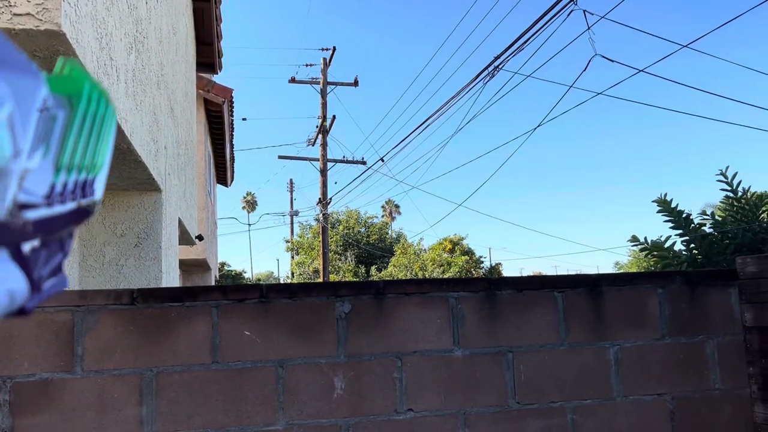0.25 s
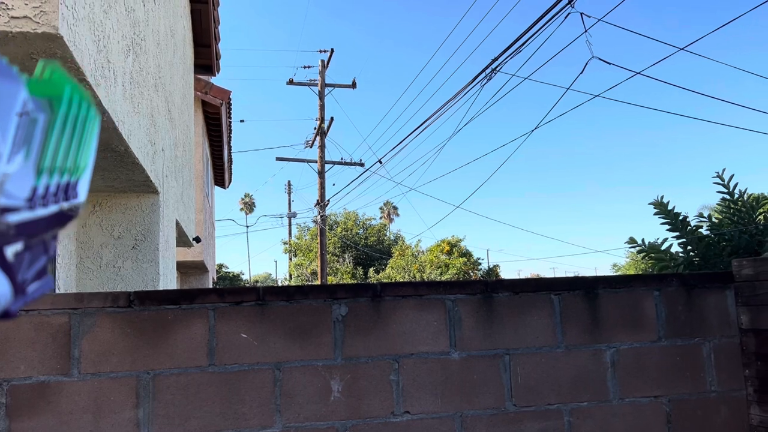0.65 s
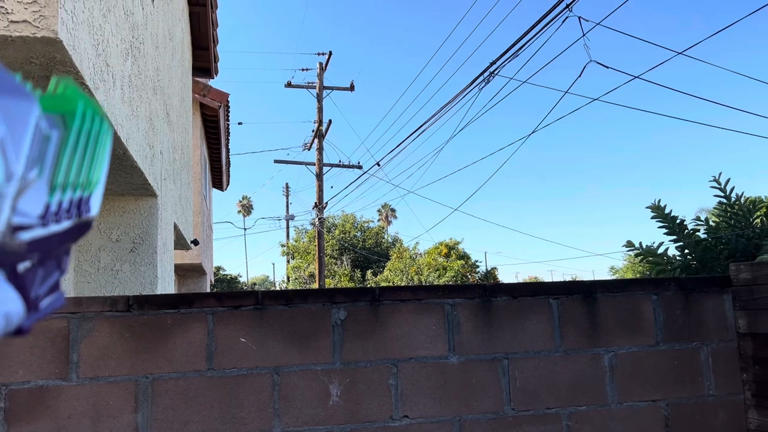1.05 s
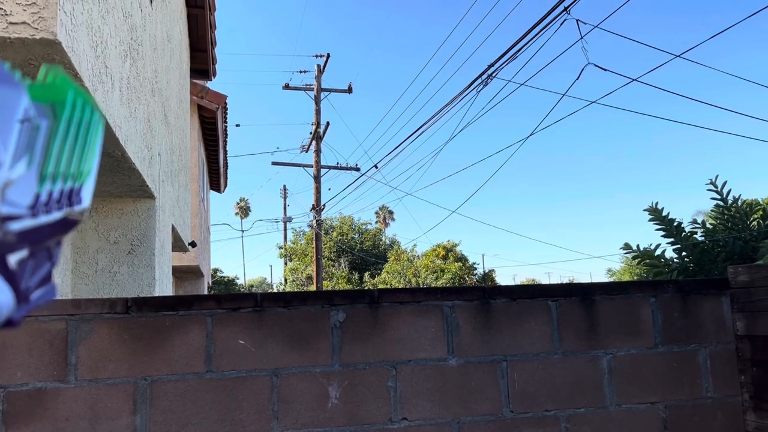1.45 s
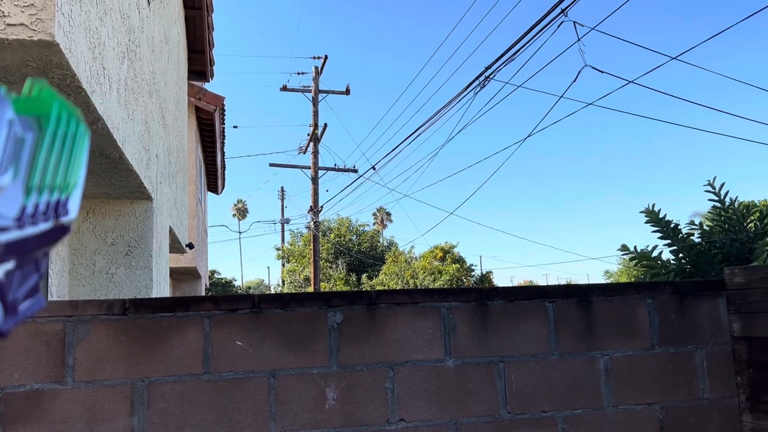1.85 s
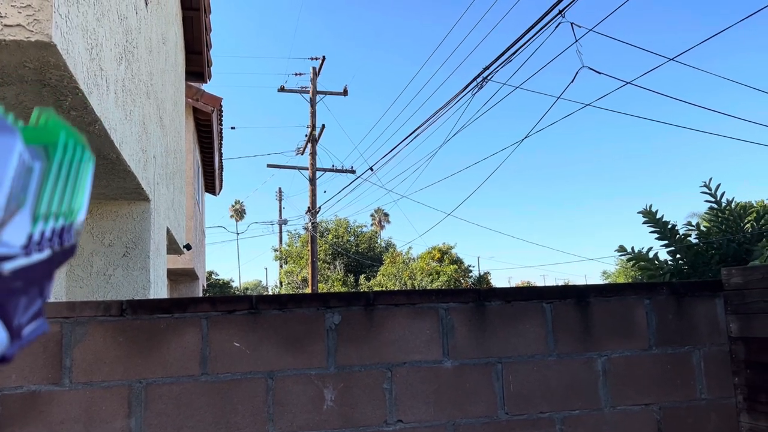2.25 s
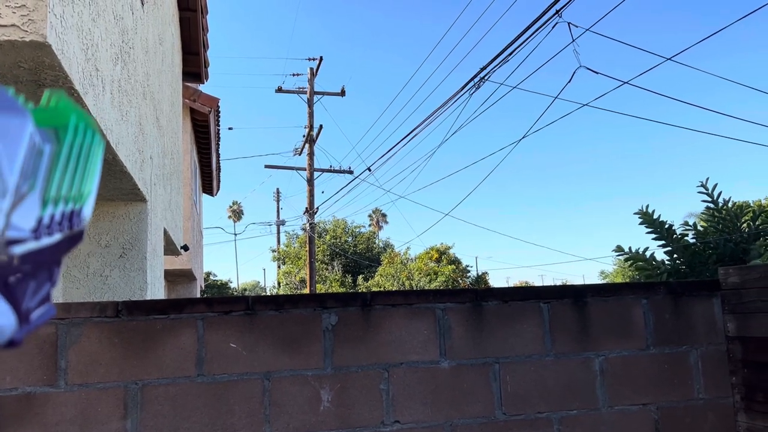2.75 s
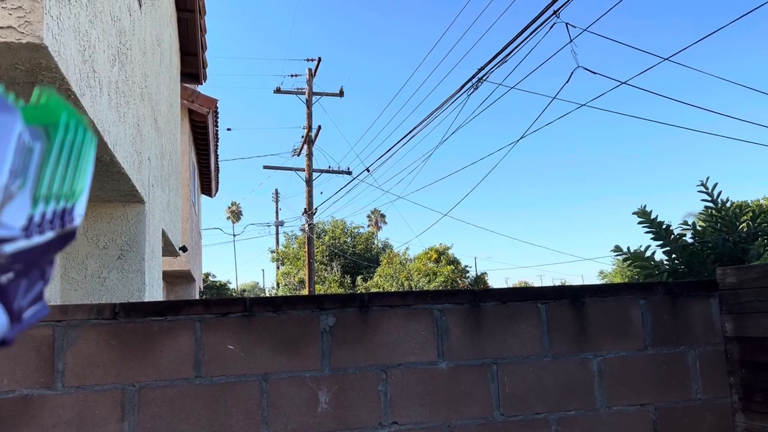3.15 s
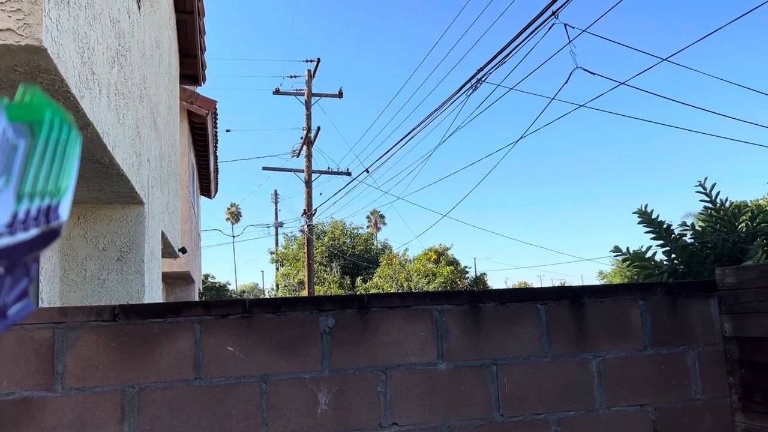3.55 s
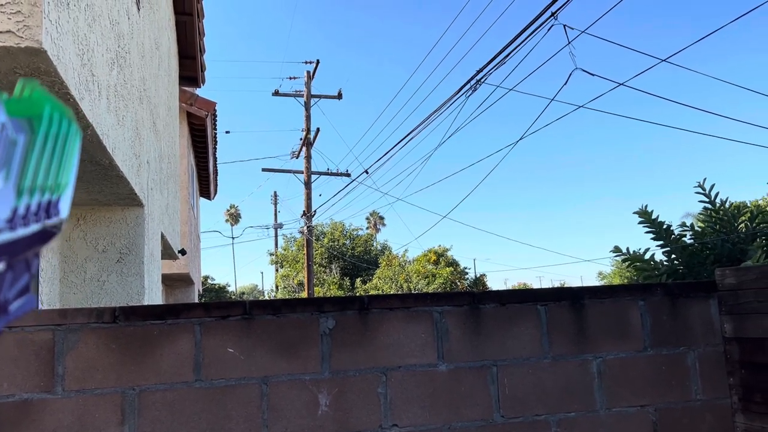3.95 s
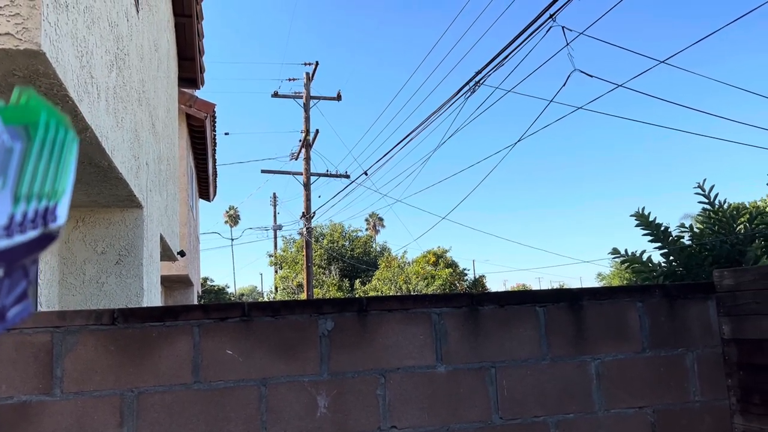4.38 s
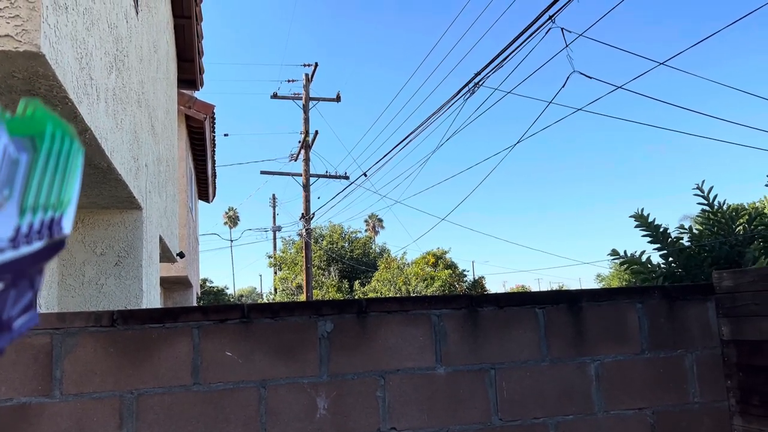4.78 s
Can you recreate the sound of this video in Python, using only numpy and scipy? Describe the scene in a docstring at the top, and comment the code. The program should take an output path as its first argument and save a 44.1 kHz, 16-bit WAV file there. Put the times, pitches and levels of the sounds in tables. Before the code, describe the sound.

A toy gel-bead blaster fires right beside a phone microphone, a little to the left, in a walled yard. The sound starts mid-action with four shots from 0 to 0.34 s, about nine a second. Two follow at 0.92-1.04 s, three at 1.44-1.66, three at 2.39-2.61, four at 2.99-3.34, five at 3.75-4.20, and three from 4.72 to the end. Each stroke has a gritty gear whine winding a spring, a hollow clack, a sharp nozzle crack, a short scrape and a full plastic slam with a low puff; brightness varies from shot to shot. The motor whirs up before bursts and coasts down after; extra snaps without shots come near 2.71 and 4.29 s. Small clicks settle in the pauses. Short wall echoes and a quick tail follow. Faint distant traffic rumbles throughout, and a very faint buzzy bird calls at about 2.05 s.

```python
"""Right by the phone a piston slams in plastic gears: a toy gel-bead blaster fires seven short bursts,
nine shots a second, in a walled yard. Each turn of its gearbox is a row of noisy contacts, all filtered
by one plastic shell: the sector gear catches the piston's rack, whining gears (sine tones) wind the spring,
the nozzle snaps forward, the piston rushes home and slams, and a puff of air leaves the barrel.
Echoes and a noise tail come off the walls; behind lie far traffic (coloured noise) and one buzzy bird call."""
import sys
import numpy as np
from scipy import signal
from scipy.fft import rfft, irfft
from scipy.io import wavfile
from scipy.ndimage import uniform_filter1d

SR = 44100
rng = np.random.default_rng(int(sys.argv[2]) if len(sys.argv) > 2 else 0)


def materialize(psi):
    """Save the field psi as 16-bit PCM at rate SR to the path in sys.argv[1].

    A 1-D psi becomes a single channel; in a 2-D psi each row is a channel.
    """
    bounded = np.clip(np.atleast_2d(psi).T, -1, 1)
    quanta = np.round(bounded * 32767).astype(np.int16)
    wavfile.write(sys.argv[1], SR, quanta)


N = 221419
TIME = np.arange(N) / SR  # s
NFFT = 2 ** 18
FREQ = np.arange(NFFT // 2 + 1) * SR / NFFT  # Hz
WIND_S = .053  # from catching the rack to the nozzle's snap

# The shots. Each row: piston slams in seconds, nozzle's lead on the slam in seconds, snap level in dB,
# force of the stroke in dB, treble of the slam in dB.
SHOTS = [(.001, .02, 0, 2.5, -11), (.117, .019, 1.5, -0.5, 8), (.229, .0205, -0.5, 1, 2),
         (.338, .019, -1, 1, 4), (.923, .034, -2.5, 0, 7.5), (1.041, .022, 0.5, 0.5, -4.5),
         (1.437, .033, -7.5, -1.5, 7), (1.553, .0216, 0, -1.5, 4.5), (1.663, .021, 0.5, -1.5, 9.5),
         (2.387, .042, 0.5, 1, 2), (2.505, .0226, 0.5, 0.5, -11.5), (2.615, .0225, 2, 0, 7.5),
         (2.988, .01, -10.5, -0.5, 7.5), (3.114, 0.025, 0, 1, -9), (3.225, .022, 0, 1.5, 4),
         (3.338, .026, 0.5, -0.5, -3), (3.751, .027, 0, 0, -4), (3.866, .022, -1.5, -.5, -11),
         (3.976, .021, 0, -2.5, 11.5), (4.087, .02, -0.5, -1.5, 8.5), (4.199, .0216, 0, 0.5, -5.5),
         (4.719, .0135, -3.5, -2.5, 4.5), (4.852, .022, 1.5, -0.5, -7), (4.967, .0244, 3, 0, 8.5)]
# Colour of the scrape along the cylinder and the rack. Each row: frequency in Hz, relative level in dB.
SCRAPE_TONE = [(80, -30), (200, -11.5), (360, -18.5), (960, 2), (1710, -3.5), (2180, -14.5), (2580, -3),
               (2800, -3), (7520, -18), (8170, -16.5), (10460, -24), (13400, -24), (14550, -43.5),
               (15800, -45.5)]


def undb(db):
    """Decibels to gain."""
    return 10 ** (np.asarray(db) / 20)


def unit(x):
    """Scale to rms 1."""
    return x / np.sqrt(np.mean(np.abs(x) ** 2))


def along(points):
    """(Hz, value) points joined on a log-frequency axis."""
    hz, value = np.transpose(points)
    return np.interp(np.log(FREQ + 1), np.log(hz + 1), value)


def through(x, response):
    """Filter by a frequency response."""
    return irfft(rfft(x, NFFT) * response, NFFT)[..., :N]


def causal(tone):
    """Minimum-phase response of unit power with the given (Hz, dB) colour."""
    cepstrum = irfft(np.log(undb(along(tone))))
    # fold the cepstrum onto positive time
    cepstrum[1:NFFT // 2] *= 2
    cepstrum[NFFT // 2 + 1:] = 0
    return unit(np.exp(rfft(cepstrum)))


def coloured(force, tone):
    """Spectrum of a contact force with the given colour."""
    return rfft(force, NFFT) * causal(tone)


def resonances(modes):
    """Response of a plastic part: the plain contact plus its modes, damped by the hands."""
    response = 1
    for hz, width_hz, db in modes:
        loss = 1j * FREQ * max(width_hz, 45, hz / 40)  # the hands set a least width
        response = response + undb(db) * loss / (hz ** 2 - FREQ ** 2 + loss)
    return response


def flutter(size):
    """Quick random unevenness of rms 1, smooth over so many samples."""
    return unit(uniform_filter1d(rng.standard_normal(N), size=size))


def grit(count, spread_db):
    """Dense tiny contacts of very uneven size, in three parts of the shell: gearbox, left wall, right wall."""
    size = undb(spread_db * rng.standard_normal((3, count)))
    return unit(rng.standard_normal((3, count)) * size)


def add(track, s, sound):
    """Mix a sound into a track at a time; one due just before the start begins at once."""
    start = max(int(s * SR), 0)
    if s > -.005 and start < N:
        track[..., start:start + sound.shape[-1]] += sound[..., :N - start]


def blows(rows, db, rise_s, hold_s, fall_s, rattle_db, rattle_s, spread_db):
    """Contact force of each blow: teeth and plastic chatter briefly, then loose parts rattle on."""
    force = np.zeros((3, N))
    t = TIME[:SR // 10]
    attack = np.minimum(t / rise_s, 1)
    impact = np.exp(-np.maximum(t - hold_s, 0) / fall_s)
    rattle = undb(rattle_db) * np.exp(-t / rattle_s)
    shape = attack * np.hypot(impact, rattle)
    soften = signal.butter(1, 4500, fs=SR)
    for s, level_db, *treble_db in rows:
        chatter = grit(len(t), spread_db) * shape
        # every blow carries the energy of its envelope
        chatter *= np.sqrt(np.sum(shape ** 2) / np.sum(chatter ** 2, axis=1, keepdims=True))
        dull = signal.lfilter(*soften, chatter)
        bright = undb(sum(treble_db)) * (chatter - dull)
        add(force, s, undb(db + level_db) * (dull + bright))
    return force


def motor():
    """Share of full speed: a steady climb when the trigger is pulled, an exponential coast when it is let go."""
    # Each row is a pull of the trigger: motor on in seconds, spin-up in seconds, motor off in seconds,
    # coasting time constant in seconds.
    pulls = [(-.1, .05, 0.38, .04), (.822, .095, 1.072, .045), (1.335, .095, 1.712, .04),
             (2.295, .075, 2.72, .025), (2.932, .07, 3.33, .085), (3.602, .125, 4.265, .025),
             (4.675, .07, 4.864, 0.11)]
    runs = []
    for on, spin_up, off, coast in pulls:
        climb = np.clip((TIME - on) / spin_up, 0, 1)
        runs.append(climb * np.exp(-np.maximum(TIME - off, 0) / coast))
    return np.max(runs, axis=0)


def gears(drive, caught, grind_db, grind_power, pressed_db):
    """Meshing teeth whine and grind; they slow down and press harder each time the spring is wound."""
    # Gear-mesh tones. Each row: frequency at full speed in Hz, level running free in dB,
    # level winding the spring in dB, gain while starting from rest in dB.
    mesh = [(1620, -4, -9, 8), (2490, -13, -.5, -2), (3240, -9, -16, 8), (4980, -16, -3, 3),
            (7470, -26, -11, 0)]
    # the spring drags the gears down once the slack is taken up; they recover when it is let go
    slack_s, sag_per_s, recover_s = .011, 4.6, .035
    since = TIME - np.append(-1, caught)[np.searchsorted(caught, TIME)]
    wound = np.clip(1 - (since - WIND_S - slack_s) / recover_s, 0, 1)
    sag = sag_per_s * np.clip(since - slack_s, 0, WIND_S - slack_s) * wound
    speed = drive * (1 - sag)
    load = np.minimum(since / slack_s, 1) * np.clip(1 - (since - WIND_S) / slack_s, 0, 1)
    # let go while winding, the gears stall against the spring and stay loaded
    surge = uniform_filter1d(np.gradient(drive) * SR, size=900) / 7
    load = np.maximum(load, np.clip(-surge, 0, 1) * (since < 2 * WIND_S))
    turn = np.cumsum(speed * (1 + .03 * flutter(size=22))) / SR
    # starting from rest, the motor drives the teeth hardest
    starting = np.sqrt(drive) * np.clip(surge, 0, 1)
    whine = 0
    for hz, free_db, loaded_db, start_db in mesh:
        level_db = -34 + free_db + load * (loaded_db - free_db) + starting * start_db
        size = undb(level_db) * (1 + .75 * flutter(size=120))
        whine = whine + size * drive ** .7 * np.sin(2 * np.pi * hz * turn)
    # the small shell hardly radiates the whine of slow gears
    whine = signal.sosfilt(signal.butter(4, 550, "high", fs=SR, output="sos"), whine)
    # the slow gear's teeth click one by one, 410 a second at full speed
    teeth = unit(.35 + np.exp(-(410 * turn % 1) / .25))
    grind = undb(grind_db + pressed_db * load) * drive ** grind_power * teeth * grit(N, spread_db=6.0)
    return whine, grind


def gear_grinding(grind):
    """The rough part of the meshing teeth, coloured by the running gears."""
    # Each row: frequency in Hz, relative level in dB.
    grinding_tone = [(80, -32), (200, -19), (500, -2), (1570, 5.5), (1710, -7.5), (2370, -1.5),
                     (2580, -6.5), (4220, -1), (4590, -8), (4980, 3.5), (9630, -13), (10460, -25.5),
                     (11360, -8.5), (15800, -22.5)]
    return coloured(grind, grinding_tone)


def piston_slams():
    """The piston hits the front of its cylinder: a full knock, its treble varying from shot to shot."""
    # Each row: frequency in Hz, relative level in dB.
    knock_tone = [(80, -30), (200, -10), (500, 2), (630, -8.5), (1230, 0.5), (1710, -3), (2370, 0),
                  (2580, -3), (7520, -10.5), (8870, -9.5), (9630, -17.5), (13400, -21), (14550, -30),
                  (15800, -43)]
    rows = [(slam, force_db, treble_db) for slam, _, _, force_db, treble_db in SHOTS]
    force = blows(rows, db=-13, rise_s=0.0016, hold_s=0.0018, fall_s=0.0021,
                  rattle_db=-9, rattle_s=.0069, spread_db=5.5)
    return coloured(force, knock_tone)


def puffs(db, lag_cycles, below_hz):
    """The barrel's air and the recoil give one push a shot; its deepest part swings out last."""
    # Colour of the puff and the recoil's knock. Each row: frequency in Hz, relative level in dB.
    puff_tone = [(20, -40), (45, -11.5), (72, 1.5), (150, 3.5), (185, -13), (320, -1), (410, -26),
                 (500, -3.5), (700, -14.5), (3000, -55)]
    lag_s = .002  # air leaves the barrel after the slam
    push = np.zeros(N)
    for slam, _, _, force_db, _ in SHOTS:
        add(push, slam + lag_s, -undb(db + force_db) * np.ones(1))
    depth = np.minimum((FREQ + 1) / below_hz, 1)
    late = np.exp(-2j * np.pi * lag_cycles * (np.log(depth) - depth + 1))
    return through(push, causal(puff_tone) * late)


def catch_times(drive, snaps):
    """After each slam the gear catches the rack, if the motor still pulls, and winds up to the next snap."""
    return_s = .042  # from the slam until the sector gear comes round to the rack
    rows = []
    for slam, _, _, force_db, _ in SHOTS:
        due = slam + return_s
        if np.interp(due, TIME, drive) > .75:
            winds = (s - WIND_S for s, _ in snaps if due < s < due + 2 * WIND_S)
            rows.append((next(winds, due), force_db))
    return rows


def rack_catches(rack):
    """The sector gear meets the piston's rack with a hollow clack."""
    # Each row: frequency in Hz, relative level in dB.
    clack_tone = [(80, -47), (200, -22), (420, -12), (630, -7), (810, 1.5), (960, -7), (2580, -4.5),
                  (3300, -13), (3890, -5.5), (4220, -11.5), (6380, -11), (10460, -22.5), (11360, -27.5),
                  (15800, -33.5)]
    force = blows(rack, db=-19.5, rise_s=0.0016, hold_s=0.0018, fall_s=.0061,
                  rattle_db=-6.5, rattle_s=.028, spread_db=5.5)
    return coloured(force, clack_tone)


def spring(caught, level_db, detune):
    """The spring hums briefly each time the rack is caught, never at quite the same pitch."""
    # Each row: mean frequency in Hz, relative level in dB, time to fall by 60 dB in seconds.
    coils = [(477.5, -6.5, 0.1), (794, -12.5, .06)]
    out = np.zeros(N)
    t = TIME[:SR // 8]
    pitches = 1 + detune * rng.standard_normal((len(caught), len(coils)))
    for s, stretches in zip(caught, pitches):
        for (hz, db, t60), stretch in zip(coils, stretches):
            decay = np.exp(-np.log(1000) * t / t60)
            add(out, s, undb(level_db + db) * decay * np.sin(2 * np.pi * hz * stretch * t))
    return out


def last_teeth(drive, snaps):
    """The rack's last tooth grates ahead of the snap, softer in gears that barely turn."""
    lead_s, slow_db = .011, -11.5
    rows = [(s - lead_s, db + slow_db * (1 - np.interp(s, TIME, drive))) for s, db in snaps]
    force = blows(rows, db=-22.5, rise_s=.007, hold_s=0.0088, fall_s=0.015,
                  rattle_db=-10.5, rattle_s=.007, spread_db=1.5)
    return coloured(force, SCRAPE_TONE)


def nozzle_snaps(snaps):
    """The nozzle jumps forward with a sharp crack and rings."""
    # Colour of the crack. Each row: frequency in Hz, relative level in dB.
    crack_tone = [(80, -24), (200, -10.5), (1330, -2), (2370, -4), (2580, -7), (3300, -3), (3890, -7.5),
                  (5410, -2), (5870, -7.5), (10460, -30), (11360, -19), (12340, -13), (14550, -25.5),
                  (15800, -31)]
    # The nozzle's ring. Each row: frequency in Hz, least width in Hz, level over the plain contact in dB.
    nozzle_modes = [(3500, 230, -2.5), (4000, 280, 4), (7060, 170, 1.5)]
    force = blows(snaps, db=-15, rise_s=0.00015, hold_s=.0017, fall_s=0.0024,
                  rattle_db=-24.0, rattle_s=0.025, spread_db=1.5)
    return coloured(through(force, resonances(nozzle_modes)), crack_tone)


def piston_rushes():
    """The released piston scrapes along its cylinder just ahead of the slam."""
    flight_s = .009
    rows = [(slam - flight_s, force_db) for slam, _, _, force_db, _ in SHOTS]
    force = blows(rows, db=-15.0, rise_s=0.00035, hold_s=0.004, fall_s=0.0082,
                  rattle_db=-9.5, rattle_s=.0079, spread_db=2.5)
    return coloured(force, SCRAPE_TONE)


def settling_ticks():
    """Trigger and gears settle between bursts with light clicks."""
    # Each row: start in seconds, level in dB, treble in dB.
    settling = [(.412, -29, 5.5), (.471, -25, -4.5), (.753, -46.5, 10), (.815, -44, -6.5), (.855, -32, -3),
                (1.163, -34.5, 1.5), (1.241, -53, 16), (1.279, -39, -12), (1.358, -34, 2), (1.795, -30, 7),
                (2.186, -55.5, 15.5), (2.222, -49, 3.5), (2.297, -42, -14.5), (2.768, -26, 6),
                (2.85, -50, 14), (2.873, -38, -11), (3.434, -21, 3.5), (3.51, -28.5, 4), (3.612, -40, -11),
                (3.627, -39, 9), (4.356, -31.5, 9), (4.612, -53.5, 15), (4.626, -39.5, -14)]
    # Colour of a click. Each row: frequency in Hz, relative level in dB.
    click_tone = [(80, -38.5), (200, -5), (390, -16.5), (810, 8.5), (3580, -9.5), (6930, -13),
                  (7520, -26.5), (8170, -26), (8870, -17.5), (9630, -24), (10460, -37.5), (11360, -30.5),
                  (13400, -24), (15800, -48)]
    force = blows(settling, db=0, rise_s=0.0047, hold_s=.0027, fall_s=0.0015,
                  rattle_db=-4, rattle_s=0.011, spread_db=5.5)
    return coloured(force, click_tone)


def blaster():
    """All contacts sound through one shell; returns the main sound and that of the shell's two side walls."""
    # The nozzle snaps once more as the gears stop short of a shot. Each row: start in seconds, level in dB.
    stalls = [(2.7079, -0.5), (4.2894, 0.5)]
    # The plastic shell. Each row: frequency in Hz, least width in Hz, level over the plain contact in dB.
    shell_modes = [(265, 8.8, -1), (353, 12, 1.5), (479.4, 26, 3), (548, 32, 3.5), (668, 35, 1.5),
                   (760, 23, -13), (1160, 40, -3), (1470, 40, -3.5), (1894, 54, -1.5), (2960, 82, -11),
                   (3440, 290, -2), (4686, 120, -8.5), (8160, 160, -14)]
    drive = motor()
    snaps = [(slam - lead, snap_db) for slam, lead, snap_db, _, _ in SHOTS] + stalls
    rack = catch_times(drive, snaps)
    caught = np.array([s for s, _ in rack])
    whine, grind = gears(drive, caught, grind_db=-32.5, grind_power=1.54, pressed_db=1.5)
    contacts = gear_grinding(grind) + piston_slams() + rack_catches(rack)
    contacts = contacts + last_teeth(drive, snaps) + nozzle_snaps(snaps)
    contacts = contacts + piston_rushes() + settling_ticks()
    clatter = irfft(resonances(shell_modes) * contacts, NFFT)[:, :N]
    thump = puffs(db=-1, lag_cycles=0.45, below_hz=120)
    hum = spring(caught, level_db=-18.0, detune=0.033)
    # the gear shafts shake both side walls alike
    return clatter[0] + whine + hum + thump, clatter[1:] + whine


def ports(x):
    """The blaster is held to the left of the phone, so its left microphone port hears it first."""
    # Each row: frequency in Hz, left minus right in dB.
    balance = [(60, 4.5), (110, 4.0), (200, 2.0), (380, 6.0), (700, 4.0), (1290, 0.0), (2380, -0.5),
               (4400, 1.0), (8120, 1.0), (15000, 0.0)]
    # Each row: frequency in Hz, phase by which left leads in radians.
    lead = [(0, 0), (520, 2.0), (1210, 2.5), (2150, 5), (2410, 6.5), (3960, 10.5), (4570, 13), (7150, 20),
            (9730, 16), (10900, 14), (12200, 14), (14600, 11), (15400, 11), (16000, 11)]
    half = undb(along(balance) / 2)
    lag = np.exp(-1j * np.interp(FREQ, *np.transpose(lead)))
    return through(x, np.array([half, lag / half]) / np.sqrt((half ** 2 + half ** -2) / 2))


def yard(x, tail_db):
    """House and block wall throw back a few echoes and a short tail."""
    # Each row: delay in seconds, level in dB.
    echoes = [(.0105, -17.5), (.0135, -14.5), (.021, -30.5), (.034, -43.5)]
    # Each row: frequency in Hz, time for the tail to fall by 60 dB in seconds.
    ring_time = [(100, 0.29), (700, 0.31), (3000, 0.29), (10000, 0.25)]
    # Colour of echoes and tail. Each row: frequency in Hz, level in dB.
    yard_tone = [(60, 1.5), (200, -1.5), (700, 0.5), (3000, -3.5), (8000, 0.5), (15000, -13)]
    t = TIME[:SR * 3 // 4]
    f, frames, tail = signal.stft(rng.standard_normal((2, len(t))), SR, nperseg=256)
    t60 = np.interp(f, *np.transpose(ring_time))
    fading = tail * np.exp(-np.log(1000) * frames / t60[:, None])
    tail = signal.istft(fading, SR)[1][:, :len(t)] * np.minimum(t / 0.0083, 1)
    response = undb(tail_db) * unit(tail) / np.sqrt(len(t))
    for k, (s, db) in enumerate(echoes):
        # echoes come from alternate sides, reaching the far port 0.3 ms later
        response[k % 2, int(s * SR)] += undb(db)
        response[1 - k % 2, int((s + .0003) * SR)] += undb(db)
    return through(x, rfft(response, NFFT) * undb(along(yard_tone)))


def town(db, left_db):
    """Far traffic, alike on both sides in the bass and a little stronger on the left."""
    # Each row: frequency in Hz, relative level per Hz in dB.
    traffic_tone = [(15, -43), (25, -18), (53, -9), (93, -6), (121, -10), (146, -16), (231, -22),
                    (293, -22.5), (515, -26), (691, -23), (811, -28.5), (1420, -28.5), (3180, -49.5),
                    (15000, -70)]
    mid, side = through(rng.standard_normal((2, N)), undb(along(traffic_tone)))
    side = through(side, np.minimum(FREQ / 500, 1))
    sign = np.array([[1], [-1]])
    return undb(db + sign * left_db / 2) * (mid + sign * side) / np.std(mid)


def bird(s, length_s, start_hz, end_hz, db):
    """One thin, buzzy call from a distant bird: a falling sine with a fluttering pitch."""
    u = np.clip((TIME - s) / length_s, 0, 1)
    hz = start_hz + (end_hz - start_hz) * u + 280 * flutter(size=50)
    return undb(db) * np.sin(np.pi * u) * np.sin(2 * np.pi * np.cumsum(hz) / SR)


def scene():
    """The blaster close by, its echoes and the quiet neighbourhood."""
    gun, sides = blaster()
    shell_walls = undb(-5.5) * sides
    echoing = yard(gun, tail_db=-15)
    call = bird(s=2.05, length_s=.15, start_hz=5350, end_hz=5100, db=-71)
    return ports(gun) + shell_walls + echoing + town(db=-60.5, left_db=0.5) + call


def record(dry):
    """The phone clips at full scale and cuts the top."""
    top_hz = 16000
    cut = signal.ellip(10, .2, 80, top_hz, fs=SR, output="sos")
    return signal.sosfilt(cut, np.clip(dry, -1, 1))


dry = scene()
out = record(dry)
materialize(out)
```